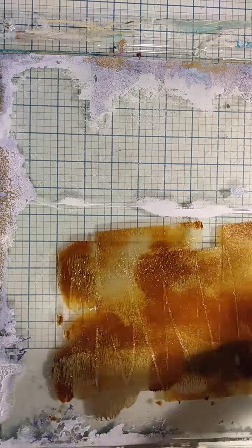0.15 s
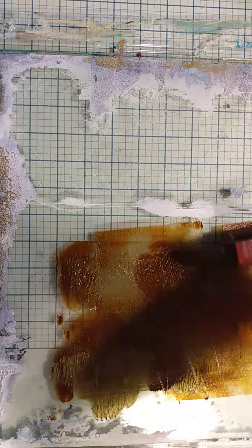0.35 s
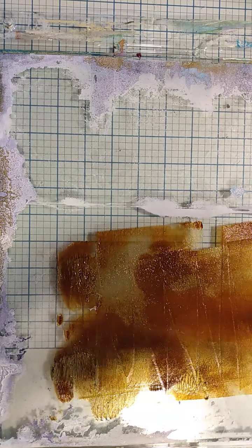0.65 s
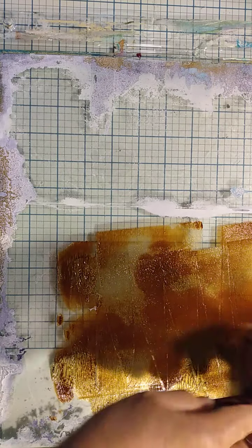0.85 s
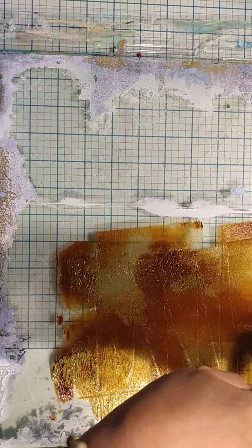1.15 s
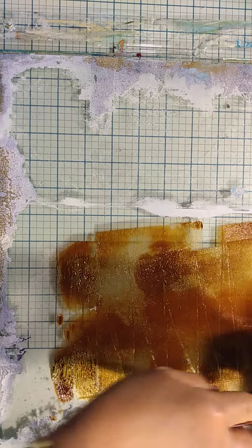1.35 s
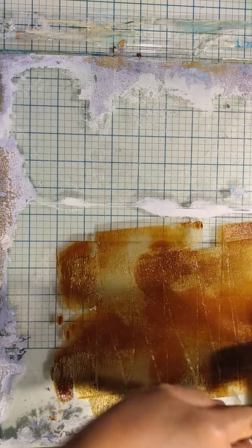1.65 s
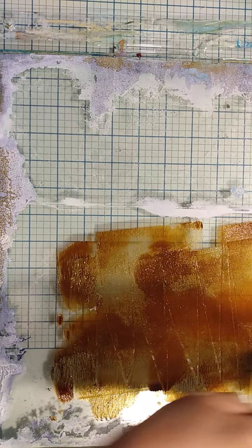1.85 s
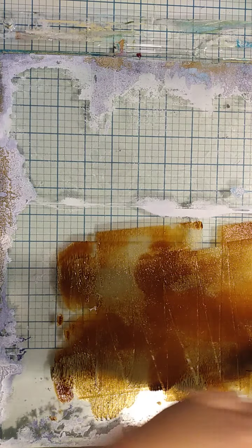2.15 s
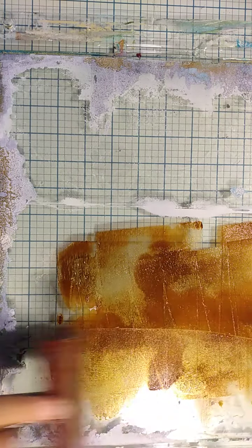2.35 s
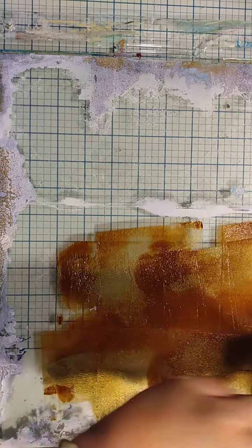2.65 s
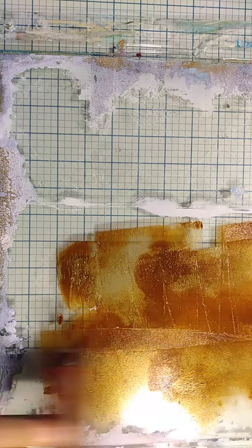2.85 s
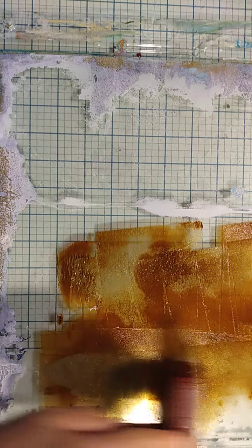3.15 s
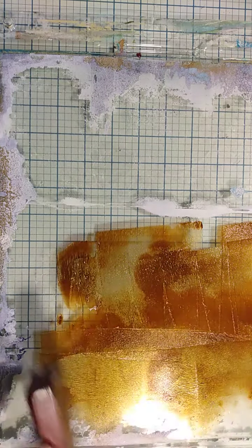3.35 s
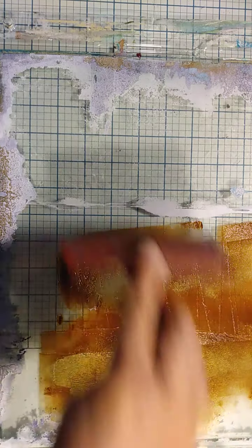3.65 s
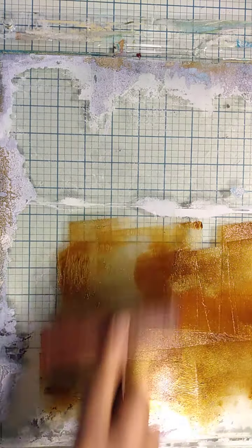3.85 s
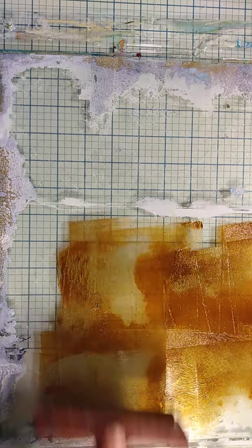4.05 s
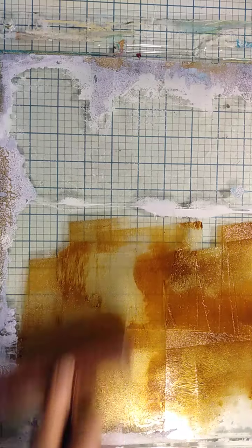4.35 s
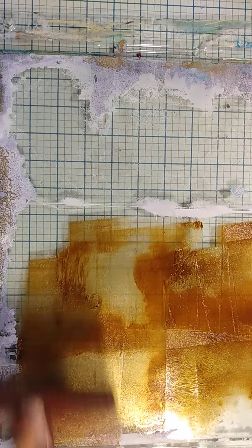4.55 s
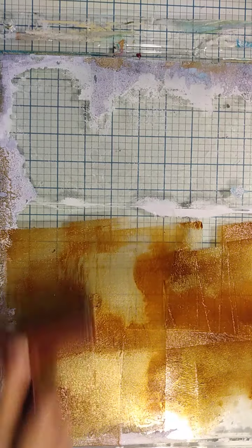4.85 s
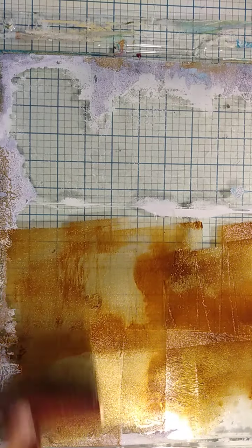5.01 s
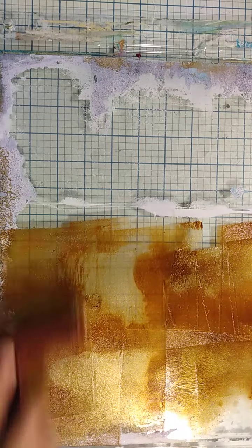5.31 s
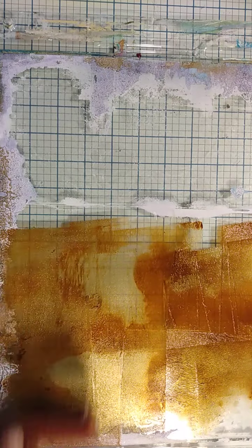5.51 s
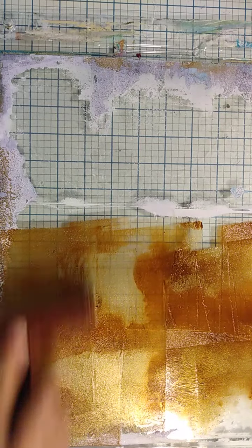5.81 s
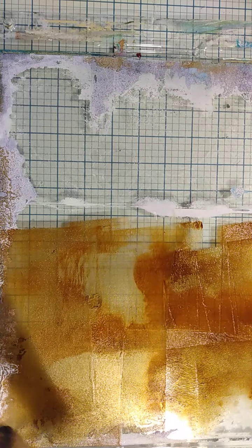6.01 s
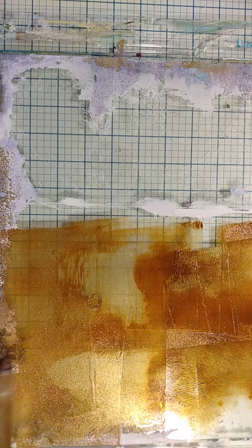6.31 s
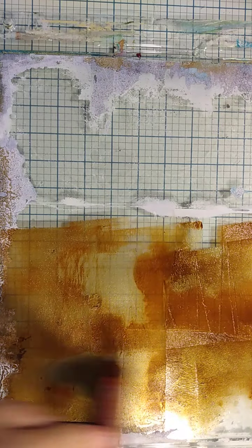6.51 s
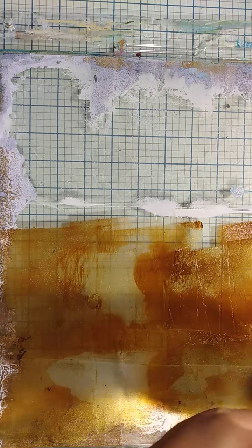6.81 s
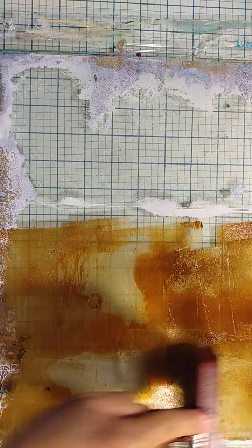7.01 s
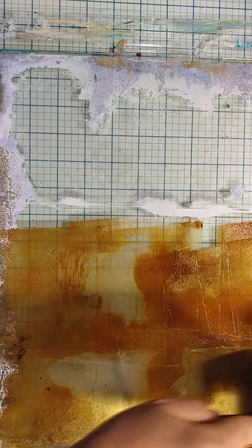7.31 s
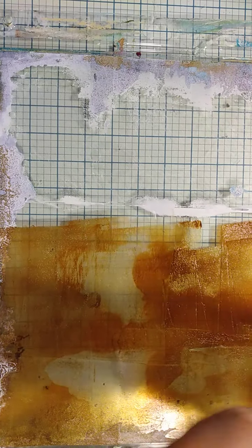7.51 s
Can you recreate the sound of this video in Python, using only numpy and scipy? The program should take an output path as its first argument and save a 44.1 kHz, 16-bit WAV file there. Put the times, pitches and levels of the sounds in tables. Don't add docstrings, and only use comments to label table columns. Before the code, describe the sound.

Sticky, crackling roller strokes over wet paint on a plate, with a rattly axle clicking at turns and a hard bump midway.

```python
import sys
import numpy as np
from scipy import signal
from scipy.fft import rfft, irfft, next_fast_len
from scipy.io import wavfile
from scipy.ndimage import uniform_filter1d, map_coordinates

SR = 44100
rng = np.random.default_rng(int(sys.argv[2]) if len(sys.argv) > 2 else 0)


def wav_record(signal):
    frames = np.transpose(np.atleast_2d(signal))
    bounded = np.clip(frames, -1, 1)
    quanta = np.round(bounded * 32767).astype(np.int16)
    wavfile.write(sys.argv[1], SR, quanta)


def gain_from_db(level_db):
    decades = np.asarray(level_db, float) / 20
    return 10 ** decades


N = 338247


def evened(x):
    return x / np.sqrt(np.mean(x ** 2) + 1e-20)


def smooth_noise(shape, width, axes=(0, 0)):
    x = rng.standard_normal(shape)
    for axis in axes:
        x = uniform_filter1d(x, width, axis=axis)
    return evened(x)


def read(points, hz):
    f, value = np.transpose(points)
    return np.interp(np.log(hz + 1), np.log(f + 1), value)


def coloured(x, points):
    size = next_fast_len(N)
    gain = gain_from_db(read(points, np.fft.rfftfreq(size, 1 / SR)))
    return evened(irfft(rfft(x, size) * gain, size)[..., :N])


def along(rows):
    s, *columns = np.transpose(rows)
    return [np.interp(np.arange(N) / SR, s, column) for column in columns]


def add(mix, s, sound):
    part = mix[..., round(s * SR):][..., :sound.shape[-1]]
    part += sound[..., :part.shape[-1]]


def ring(modes, detune=0, scatter_db=0, chance=np.zeros(20)):
    hz, db, t60_ms = np.transpose(modes)[:, :, None]
    t = np.arange(round(t60_ms.max() * SR / 1000) + 64) / SR
    strength, shift = chance[:2 * len(modes)].reshape(2, -1, 1)
    u = t * 1000 * np.log(1000) / t60_ms
    shape = np.exp(-u) * (1 - np.exp(-3.5 * u)) / np.sqrt(t60_ms)
    sign = (-1) ** np.arange(len(modes))[:, None]
    tone = np.sin(2 * np.pi * hz * (1 + detune * shift) * t)
    return (sign * gain_from_db(db + scatter_db * strength) * shape * tone).sum(0)


def snaps(per_s, spread_db):
    size = gain_from_db(spread_db * np.minimum(rng.exponential(1, N), 4))
    return size * rng.standard_normal(N) * (rng.random(N) < per_s / SR)


def shaken(modes, per_s):
    return evened(signal.oaconvolve(snaps(per_s, 3.5), ring(modes))[:N])


def patchy(x):
    z = signal.stft(x, nperseg=256)[2]
    patch_db = 3 * smooth_noise(z.shape, 10, axes=(0, 1))
    return evened(signal.istft(z * gain_from_db(patch_db), nperseg=256)[1][:N])


def hump(t, s, rise, fall):
    return -20 * (abs(t - s) / np.where(t < s, rise, fall)) ** 1.25


def summed(levels_db):
    db = 10 * np.log10(sum(gain_from_db(level) ** 2 for level in levels_db) + 1e-14)
    return np.interp(np.arange(N) / SR, np.arange(len(db)) / 1000, db)


# f/Hz, density level/dB
HUSH_SPECTRUM = [(18, -35.5), (30, -6.5), (128, -6), (298, -14.5), (504, -25.5), (790, -32.5),
                 (1410, -25.5), (16400, -37.5)]


def hush():
    noise = rng.standard_normal(N) + 0.39 * rng.standard_normal((2, N))
    return gain_from_db(-81.5) * coloured(noise, HUSH_SPECTRUM)


# f/Hz, T60/s
ROOM_DECAY = [(150, 0.014), (600, 0.12), (2000, 0.1), (6000, 0.11), (14000, 0.095)]


def room(x):
    taps = np.zeros((2, SR // 2))
    starts = np.arange(120, SR // 2 - 20, 20)
    at = starts + rng.integers(0, 20, (2, len(starts)))
    np.put_along_axis(taps, at, rng.choice([-1., 1.], at.shape), 1)
    hz, t, z = signal.stft(taps, SR, nperseg=128)
    decay = gain_from_db(-60 * t / read(ROOM_DECAY, hz)[:, None])
    tail = signal.istft(z * decay, SR, nperseg=128)[1]
    tail = tail / np.linalg.norm(tail, axis=1, keepdims=True)
    return signal.oaconvolve(x[None], tail, axes=1)[:, :N]


# t/s, lag of the left port/samples, left-right level difference/dB
ROLLER_PLACE = [(0, -2, -.9), (.75, -8, .1), (1.2, 3, -1.8), (1.75, 8, -1.3), (2.75, 10, -2.2),
                (3.3, 9, -1.9), (3.75, -4, -.3), (4.25, -1, -1.5), (5.25, -2, .9), (5.8, -3, .1),
                (6.2, 9, -3.2), (6.75, 10, -2.6), (7.3, 7, -3.5), (7.67, 5, -1.1)]


def ports(x):
    scatter_db, scatter_s, shift_s = -5, .0006, 1.3
    n, (late, pan_db) = np.arange(N), along(ROLLER_PLACE)
    pair = np.array([gain_from_db(side * pan_db) * map_coordinates(x, [n - side * late], order=3)
                     for side in (.5, -.5)])
    echo = np.diff(rng.standard_normal((3, 2, 301))) * np.exp(-np.arange(300) / SR / scatter_s)
    echo = gain_from_db(scatter_db) * echo / np.linalg.norm(echo, axis=2, keepdims=True)
    phase = n / SR / shift_s + np.arange(3)[:, None, None] / 3
    turn = np.sqrt(2 / 3) * np.cos(np.pi * phase)
    scattered = signal.oaconvolve(turn * pair, echo, axes=2).sum(0)[:, :N]
    return (pair + scattered) / np.sqrt(1 + gain_from_db(scatter_db) ** 2)


# t/s, peak level/dB, f/Hz, T60/s
THUDS = [(0.902, -51, 159.5, 0.17), (1.051, -49.5, 452, 0.11), (1.437, -54.5, 96.5, 0.36),
         (2.266, -64, 480, 0.11), (2.94, -74, 476, 0.13), (3.692, -31, 335, 0.054),
         (3.6928, -33.5, 208, 0.16), (3.704, -27, 209.5, 0.1), (6.441, -47.5, 198, 0.13),
         (5.45, -63, 803, 0.098), (6.69, -45.5, 710, 0.048), (5.442, -64, 461, .1),
         (3.888, -40.5, 109, 0.24), (4.392, -45.5, 477, 0.062), (5.501, -54.5, 111, 0.071),
         (5.716, -72, 257, 0.41), (6.434, -45, 380, 0.056), (6.931, -48.5, 338, 0.035),
         (7.575, -46, 385, 0.032), (1.714, -53, 244, 0.069), (4.139, -61, 404, 0.042),
         (4.216, -64, 995, 0.09), (4.324, -66.5, 942, 0.11), (6.668, -45, 603, 0.026),
         (6.751, -70, 230, 0.037), (6.915, -55.5, 209, 0.11), (7.589, -42, 318, 0.035),
         (3.205, -61, 980, .04), (3.365, -47.5, 785, 0.038)]
# f/Hz, level/dB, T60/ms
LEG_MODES = [(59.6, 4, 75), (117.2, 7, 440), (166.4, 1.5, 91), (187, -26.5, 130)]


def thuds():
    out, t = np.zeros(N), np.arange(2500) / SR
    legs = [(f, db - 21, ms) for f, db, ms in LEG_MODES]
    # ratio to its pitch, level/dB, T60 ratio/(ms/s)
    partials = [(1, 0, 900), (.62, -15, 500), (1.3, -7, 500), (1.6, -8, 500), (2.05, -10, 400),
                (3.1, -17, 300)]
    for s, db, hz, t60 in THUDS:
        chance = rng.standard_normal(2540)
        blow = np.exp(-t / 0.00022) + 0.062 * chance[40:] * np.exp(-t / 0.027)
        plate = [(hz * ratio, level, length * t60) for ratio, level, length in partials]
        body = signal.oaconvolve(blow, ring(plate + legs, .015, 2.2, chance))
        add(out, s - .002, gain_from_db(db + 1.5) * body / abs(body).max())
    return out


# t/s, tick level/dB, frame level/dB, plate level/dB, loudest frame f/Hz
SLAMS = [(0.1946, -33.5, -36, -47.5, 4000), (0.601, -22.5, -24.5, -36, 3900),
         (1.059, -26.5, -34.5, -34.5, 2900), (1.3307, -30.5, -47.5, -41.5, 3040),
         (1.4325, -25.5, -23.5, -33.5, 3900), (1.8536, -35, -37.5, -41.5, 3000),
         (2.1436, -38, -35, -40, 2950), (3.1313, -33, -49, -79, 4570), (3.4842, -26.5, -48.5, -64.5, 2990),
         (3.8783, -16.5, -33, -30, 3330), (4.3942, -27, -27.5, -34.5, 3160),
         (5.2926, -43, -38.5, -47.5, 3150), (6.1553, -55, -55, -68, 3930), (6.231, -30.5, -27.5, -52, 3670),
         (6.4386, -38, -34, -37, 2940)]
# t/s, tick level/dB, frame level/dB, plate level/dB, loudest frame
# f/Hz
BOUNCES = [(1.0625, -23, -25.5, -49.5, 2990), (3.8832, -21, -23, -37, 3360),
           (3.8868, -37.5, -30, -41.5, 3600), (3.8925, -46, -44, -60, 3160),
           (4.3972, -27, -30.5, -43, 3150), (4.8708, -26, -31.5, -31.5, 2900),
           (4.8735, -23, -42, -47.5, 3300), (4.8815, -33, -43, -60, 3270), (5.85, -39, -50, -47, 3650),
           (6.4475, -39, -39, -55, 2910), (6.2405, -50.5, -49.5, -55.5, 3900),
           (5.296, -37.5, -29, -50, 3150), (6.159, -25.5, -26.5, -46.5, 3900),
           (6.4413, -23.5, -23.5, -34.5, 2900)]
# t/s, tick level/dB, frame level/dB, plate level/dB,
# loudest frame f/Hz
AXLE_SNAPS = [
    (1.538, -31.5, -26, -34.5, 2940),
    (1.6741, -33, -38.5, -47.5, 4500),
    (1.71, -27, -38.5, -41, 3200),
    (4.8679, -33, -34.5, -36.5, 2700),
    (5.8422, -26, -30.5, -38, 3650),
]
# t/s, tick level/dB, frame level/dB, plate level/dB
BUMPS = [
    (6.6655, -38, -61, -37.5),
    (6.908, -40.5, -78, -48),
    (6.936, -70, -78, -67),
    (7.3754, -57, -74, -54.5),
    (7.569, -38.5, -40.5, -49),
    (7.598, -57.5, -53, -53.5),
    (7.6233, -46.5, -54, -48),
    (7.6582, -35, -26.5, -35),
]
# t/s, tick level/dB, frame level/dB, plate level/dB
JIGGLES = [(0.1661, -49, -87, -98), (0.6712, -41.5, -38.5, -50.5), (0.754, -42.5, -79, -85.5),
           (0.7748, -45, -38.5, -84), (0.7871, -33, -41, -67.5), (0.8678, -62, -40.5, -67),
           (0.9614, -50.5, -38.5, -62.5), (0.978, -46.5, -45.5, -64.5), (1.0062, -56, -40.5, -54.5),
           (1.0356, -43, -38.5, -56.5), (1.0483, -58, -50, -50), (1.2082, -50.5, -67, -90),
           (1.2925, -46.5, -42, -46), (1.3213, -37, -46.5, -45.5), (1.364, -43, -50.5, -53),
           (1.4485, -37.5, -65, -60), (1.6047, -46, -52, -63), (1.882, -43.5, -48, -57.5),
           (1.9137, -49, -62, -65), (1.981, -52, -81, -93), (2.1966, -59, -45, -58), (2.277, -48, -57, -71),
           (5.2612, -56, -45.5, -91)]
# t/s, tick level/dB, frame level/dB, plate level/dB
TURNS = [(2.473, -58, -47, -63.5), (2.492, -69, -50.5, -73), (2.9875, -46, -50.5, -77),
         (3.091, -55, -58.5, -92.5), (3.118, -45.5, -49, -80), (3.127, -37, -63.5, -70),
         (3.155, -57, -64, -47.5), (3.32, -43, -64, -48.5), (3.36, -53, -40, -58.5),
         (3.3835, -57, -51, -81), (3.4325, -41.5, -52, -65), (4.1136, -39.5, -62, -83),
         (4.1344, -41.5, -45.5, -60), (4.37, -49.5, -50, -61), (4.6036, -41, -68, -65),
         (4.6246, -51, -48, -59), (5.1316, -41, -65, -62.5), (5.139, -46, -52, -63.5),
         (5.366, -52, -55, -64), (5.6191, -42.5, -46.5, -58.5), (6.0619, -37.5, -42, -94),
         (6.071, -45.5, -39.5, -62), (6.4298, -53, -70, -48), (6.4909, -40, -50, -44.5),
         (6.888, -43, -61, -76), (6.9761, -53, -75, -65)]
# t/s, tick level/dB, frame level/dB, plate level/dB
TEARS = [(3.149, -38, -55, -43.5), (3.172, -36.5, -63, -63), (3.181, -46, -62, -43), (3.194, -33, -60, -51),
         (3.205, -50, -59, -39), (3.212, -42, -49, -56), (3.221, -56, -63, -60), (3.228, -35.5, -56, -47.5),
         (3.24, -56, -63, -58), (3.347, -55, -62, -50.5), (3.368, -49, -56, -44), (3.459, -48, -54, -66),
         (3.474, -42, -49, -60.5), (0.329, -53.5, -60, -87), (0.404, -51, -48, -68), (6.149, -58, -60, -68),
         (6.68, -52, -56, -41), (6.695, -45, -46, -60), (6.797, -60, -65, -49.5), (6.815, -57, -61, -67),
         (3.742, -45, -52, -44), (3.757, -58.5, -62.5, -54), (2.225, -74, -74, -80), (2.587, -69, -88, -87),
         (2.696, -59, -58, -88), (3.035, -57, -57.5, -85), (1.0015, -72, -58, -76), (1.029, -72, -46, -66),
         (1.587, -60, -53, -48), (0.256, -59, -51, -61), (0.7, -51, -55, -73), (7.095, -62, -63.5, -86),
         (7.594, -45.5, -55.5, -64)]


def blows():
    usual_hz, dull_hz = 3150, 2220
    # rows, rattle T60/s, lift of the tick above 11 kHz/dB, lift of the plate below 900 Hz/dB
    pitched = [(SLAMS, .026, -1, -5), (AXLE_SNAPS, .026, 11.5, -7.5), (BOUNCES, .04, -1, -5)]
    # rows, rattle T60/s, loudest frame f/Hz
    small = [(BUMPS, .16, dull_hz), (JIGGLES, .036, usual_hz), (TURNS, .21, usual_hz),
             (TEARS, .019, usual_hz)]
    loud = [(*row, t60, hz, *lifts) for rows, t60, *lifts in pitched for *row, hz in rows]
    return loud + [(*row, t60, hz, 4.5, 5) for rows, t60, hz in small for row in rows]


# f/Hz, level/dB, T60/ms
TICK_MODES = [(5900, -9, 2), (7230, -6, 6), (8800, -1, 1.8), (10200, -1, 1.8), (12000, -9, 1.3),
              (14500, -13, 1.1)]
# f/Hz, level/dB, T60/ms
FRAME_MODES = [(2246, -17, 17), (2953, -4.5, 5.8), (3293, -3, 7), (3650, -5, 5.7), (3940, -6, 6),
               (4460, -9.5, 4.4), (5470, -15.5, 1.2)]
# f/Hz, level/dB, T60/ms
PLATE_MODES = [(676, 2, 14), (740, -1, 16), (1087, 6.5, 7.4), (1410, 2.5, 3.33), (1517, 6.5, 19.4),
               (1630, 6.5, 2.82), (2395, 10.5, 1.48)]


def clacks():
    out, t = np.zeros(N), np.arange(6000) / SR - .004
    slip = gain_from_db(-37.5 + 7500 * t)
    crack = np.exp(-abs(t / 0.002) ** 1.5)
    onset = np.minimum(t / 0.00006 + 0.6, 1)
    for s, tick_db, frame_db, plate_db, t60, hz, edge_db, low_db in blows():
        chance = rng.standard_normal((3, 6020))
        tick = [(f, db + edge_db * (f > 11000), ms) for f, db, ms in TICK_MODES]
        frame = [(f, db + 2.5 * np.exp(-((f - hz) / 450) ** 2), ms) for f, db, ms in FRAME_MODES]
        plate = [(f, db + low_db * (f < 900), ms) for f, db, ms in PLATE_MODES]
        # modes, peak level/dB, rattle re crack/dB, share of the rattle's length
        parts = [(tick, tick_db + 1.0, -15, 1.05), (frame, frame_db + 1.5, -19, .8),
                 (plate, plate_db + 1.0, -10, 1.1)]
        for (modes, db, rattle_db, share), draw in zip(parts, chance):
            fall = crack + gain_from_db(rattle_db - 60 * t / max(t60 * share, .01))
            force = draw[20:] * np.where(t < 0, slip, fall * onset)
            force[round(-t[0] * SR) + 4] += 4
            part = signal.oaconvolve(force, ring(modes, .015, 1.5, draw))
            peak = np.sqrt(uniform_filter1d(part ** 2, 90).max())
            add(out, s + t[0], gain_from_db(db) * part / peak)
    return out


# start re plate level/dB, decay rate/(dB/s)
CLACK_HUM = [(-23.5, 152), (-22, 158), (-22.5, 79.5)]


def hums(t):
    return [[np.where(t < s, -200, db + start_db - fall * (t - s)) for s, _, _, db, *_ in blows()]
            for start_db, fall in CLACK_HUM]


# heaviest t/s, rise/s, fall/s, table top level/dB, table legs level/dB
LEANS = [(0.05, 0.55, 0.15, -56, -61), (0.23, 0.09, 0.33, -53, -68), (0.45, 0.12, .2, -79, -80),
         (0.7, 0.35, 0.22, -60, -76), (1.07, 0.087, 0.2, -65, -50), (1.46, 0.06, 0.09, -114, -52.5),
         (1.72, 0.073, 0.033, -58, -81), (1.9, 0.051, 0.24, -76, -63.5), (2.16, .04, 0.53, -66.5, -86.5),
         (2.95, 0.11, 0.28, -63, -59), (3.2, 0.067, 0.23, -51, -61.5), (3.4, 0.24, 0.1, -69.5, -62),
         (3.715, .03, 0.12, -37, -63.5), (3.9, .04, 0.81, -73.5, -57), (4.17, .06, 0.064, -60.5, -69),
         (4.42, .04, 0.15, -54.5, -45.5), (4.65, 0.23, 1, -83.5, -62.5), (5.129, 0.051, 0.065, -64, -49.5),
         (5.48, 0.14, 0.58, -69, -54), (6.07, 0.12, 0.1, -61, -73), (6.25, 0.108, 0.084, -65, -52),
         (6.46, 0.13, 0.11, -56, -64.5), (6.92, 0.23, 0.36, -64, -60.5), (7.6, 0.026, 0.48, -50.5, -86)]


def leaning(t):
    top = [top_db + hump(t, s, rise, fall) for s, rise, fall, top_db, _ in LEANS]
    legs = [legs_db + hump(t, s, rise, fall) for s, rise, fall, _, legs_db in LEANS]
    sway = smooth_noise(len(t), 150)
    return top + [-82.5], legs + [-73 - 7 * sway]


# fastest t/s, rise/s, fall/s, fizz level/dB, weight on the plate/dB
PUSHES = [(0.0, 0.18, 0.29, -61, -20), (0.2, 0.023, 0.13, -53, -3), (0.42, 0.11, 0.11, -58.5, -14.5),
          (0.574, 0.092, 0.17, -65, -41), (0.669, 0.1, 0.023, -53, -8), (0.942, 0.37, 0.42, -65, -29),
          (1.112, 0.16, 0.098, -65.5, -30.5), (1.295, 0.013, 0.16, -62.5, -9),
          (1.587, 0.14, 0.098, -59.5, -15), (1.98, 0.36, 0.1, -67.5, -35), (2.198, 0.11, 1, -64.5, -33),
          (2.475, 0.26, 0.11, -56, -27), (2.71, 0.072, 0.13, -53.5, -25), (2.99, 0.13, 0.071, -53.5, -54),
          (3.15, 0.052, 0.072, -48, -18), (3.21, 0.058, 0.053, -45, -3), (3.361, 0.13, 0.17, -50, -15.5),
          (3.744, 0.044, 0.12, -46, -7), (7.309, 0.026, 0.028, -61, -22), (7.383, 0.019, 0.041, -59, -14),
          (7.477, 0.16, 0.044, -73.5, -27), (6.914, 0.068, 0.021, -63.5, -14)]
# landing t/s, lifting t/s, swell on the way/dB, fizz level at the lift/dB, weight/dB
PULLS = [(3.947, 4.18, -13, -65.5, -16), (4.377, 4.592, 6.5, -55, -18), (4.917, 5.115, -3, -61, -25),
         (5.336, 5.566, 6, -57, -28), (5.849, 6.045, 15, -54.5, -22), (6.193, 6.434, 7.5, -68, -4.5),
         (6.432, 6.626, 3, -61.5, -20), (6.664, 6.814, -3, -60.5, -3.5), (6.668, 6.7, -11.5, -57.5, -24),
         (6.984, 7.085, -0.5, -66.5, -33), (7.214, 7.365, -5, -72.5, -25), (7.534, 7.684, 21, -58.5, -6)]


def strokes(t):
    moves = [(db + hump(t, s, rise, fall), -6.5, weight_db) for s, rise, fall, db, weight_db in PUSHES]
    for lands, lifts, swell_db, db, weight_db in PULLS:
        way = db - swell_db * np.clip((lifts - t) / (lifts - lands), 0, 1)
        edges = 509 * np.maximum(lands - t, 0) + 171 * np.maximum(t - lifts, 0)
        moves.append((way - edges, -9, weight_db))
    return moves


def effort():
    t = np.arange(N * 1000 // SR + 2) / 1000
    moves = strokes(t)
    plate_hum, top_hum, legs_hum = hums(t)
    top_lean, legs_lean = leaning(t)
    fizz = [db for db, _, _ in moves] + [-95]
    frame = [-55 + 0.94 * (db + 55) + frame_db for db, frame_db, _ in moves]
    loaded = [db + weight_db for db, _, weight_db in moves]
    return (summed(fizz), summed(frame), summed(plate_hum + loaded),
            summed(top_hum + top_lean), summed(legs_hum + legs_lean))


# f/Hz, density level/dB
FIZZ_SPECTRUM = [(1750, -42), (2600, -23), (5300, -22.5), (7980, -13), (9810, -8.5), (15300, -20),
                 (16000, -40), (16400, -46.5)]
# f/Hz, density level/dB
PEEL_SPECTRUM = [(900, -32), (2000, -15), (3200, -2), (5000, 3.5), (7000, -4), (9000, -18), (12000, -31)]
# f/Hz, level/dB, T60/ms
LOADED_FRAME_MODES = [(2350, -11, 14), (2950, -4.5, 6.8), (3200, 0, 5.9), (3900, -17, 5)]
# f/Hz, level/dB, T60/ms
TOP_MODES = [(335, 1, 39), (430, 7, 89), (490, 0, 48), (685, -4, 27)]


def stroke():
    fizz_db, frame_db, plate_db, top_db, legs_db = effort()
    wobble = smooth_noise(N, 300)
    threads = patchy(coloured(snaps(13000, 3.0), FIZZ_SPECTRUM))
    tack = .7 * gain_from_db(fizz_db + 4.5 + 2.2 * wobble)
    ends = np.array([np.roll(threads, N // 3), np.roll(threads, -N // 3)])

    frame = gain_from_db(frame_db - 3.0 + 3.1 * wobble) * patchy(shaken(LOADED_FRAME_MODES, 3600))
    plate = gain_from_db(plate_db + 2.5 + 0.64 * wobble) * patchy(shaken(PLATE_MODES, 900))
    speed_db = -69 + 1.6 * (fizz_db + 54.5) + 2.0 * wobble
    peel_gain = np.hypot(gain_from_db(speed_db), gain_from_db(plate_db - 3.5))
    peel = peel_gain * patchy(coloured(snaps(3500, 3.2), PEEL_SPECTRUM))

    legs = shaken(LEG_MODES, 410)
    wide_legs = legs + np.outer([.22, -.22], np.roll(legs, N // 3))
    top = gain_from_db(top_db - 7.5) * patchy(shaken(TOP_MODES, 600))
    table = top + gain_from_db(legs_db - 7.0) * wide_legs
    return tack * threads + frame + plate + peel, tack * ends, table


def scene():
    near, ends, rumble = stroke()
    roller = clacks() + near
    table = thuds() + rumble
    far = room(gain_from_db(-6.0) * roller + gain_from_db(-1.5) * table.mean(0))
    shade = gain_from_db(np.outer([.5, -.5], along(ROLLER_PLACE)[1]))
    return ports(roller) + shade * (ends + far + hush()) + table * gain_from_db([[-.9], [.9]])


def low_pass(x):
    return signal.sosfilt(signal.butter(12, 16800, fs=SR, output="sos"), x)


def record(dry):
    bass_cut = signal.butter(4, 50, "high", fs=SR, output="sos")
    top_cut = signal.cheby2(10, 35, 16500, fs=SR, output="sos")
    band = signal.sosfilt(top_cut, signal.sosfilt(bass_cut, dry))
    return low_pass(band)


dry = scene()
out = record(dry)
wav_record(out)
```